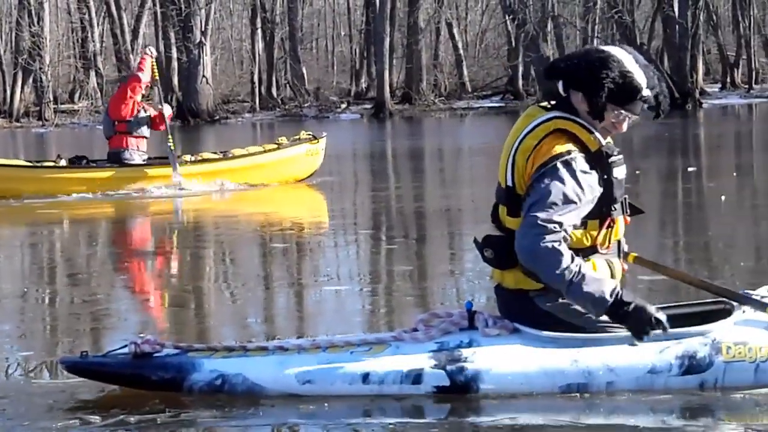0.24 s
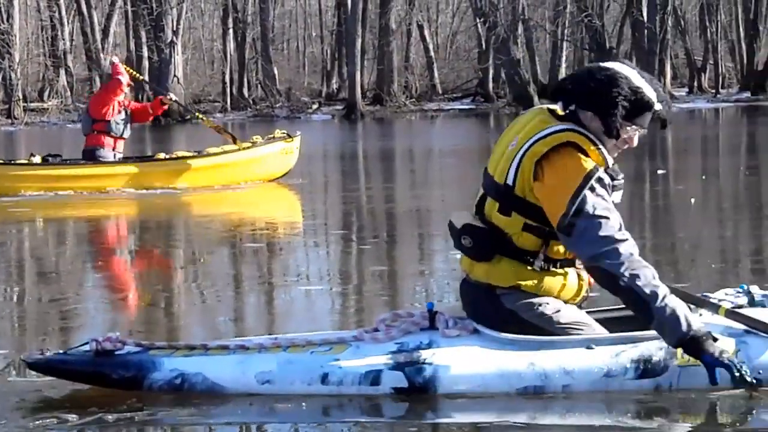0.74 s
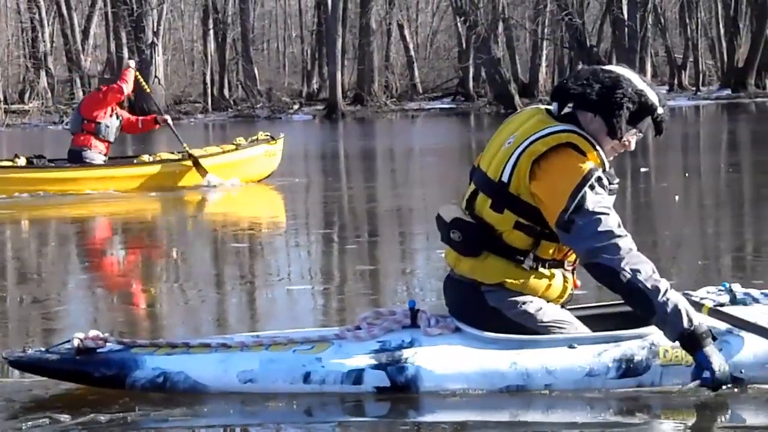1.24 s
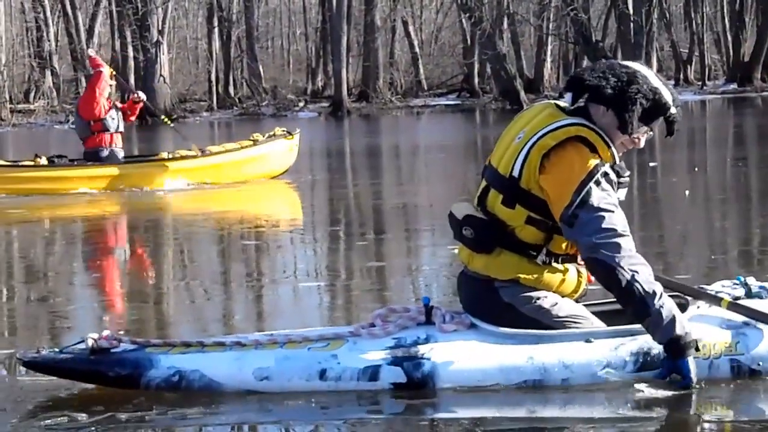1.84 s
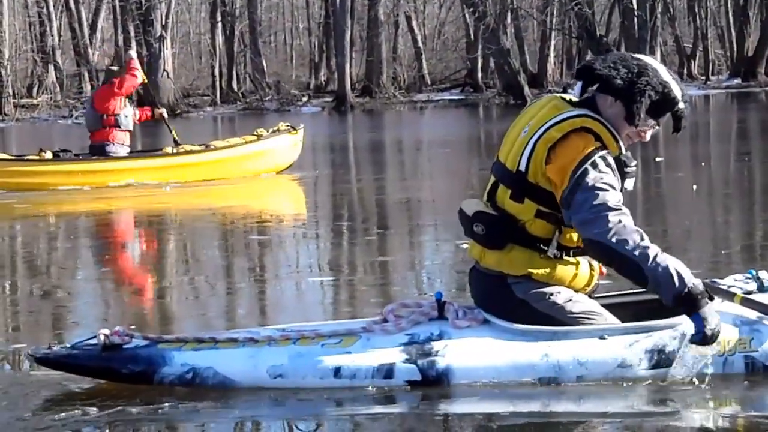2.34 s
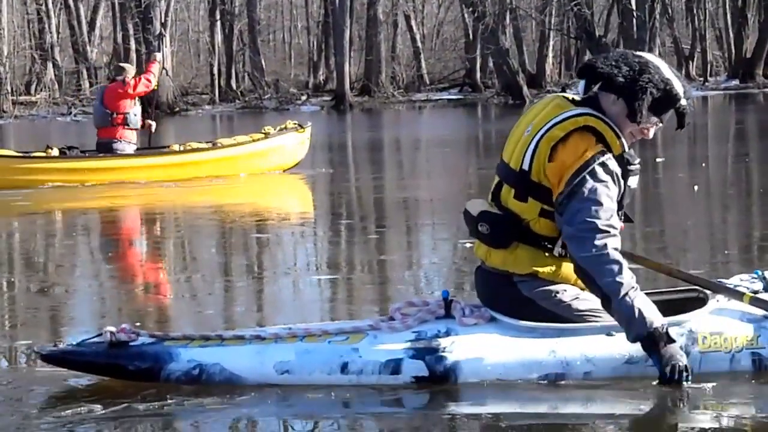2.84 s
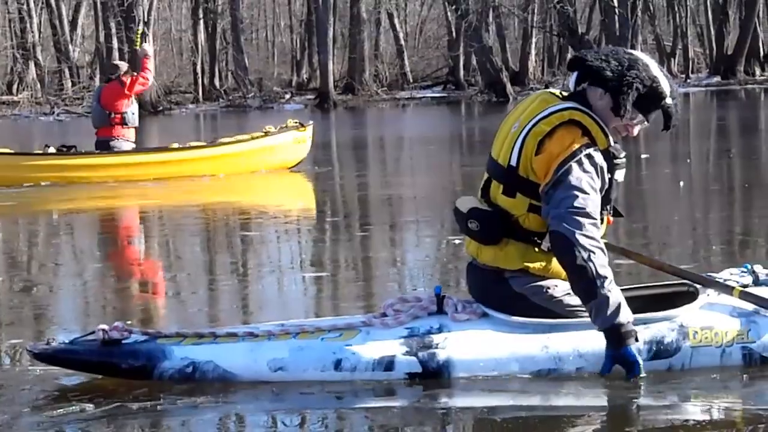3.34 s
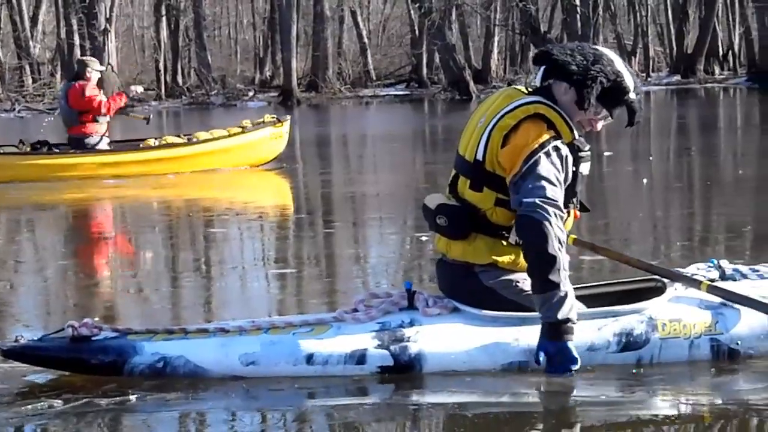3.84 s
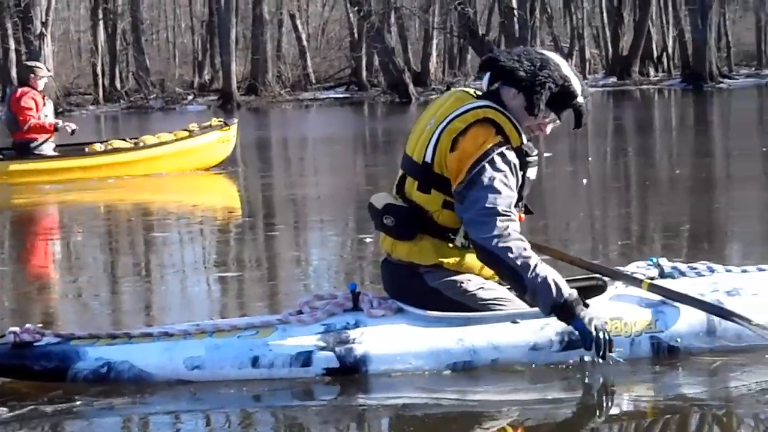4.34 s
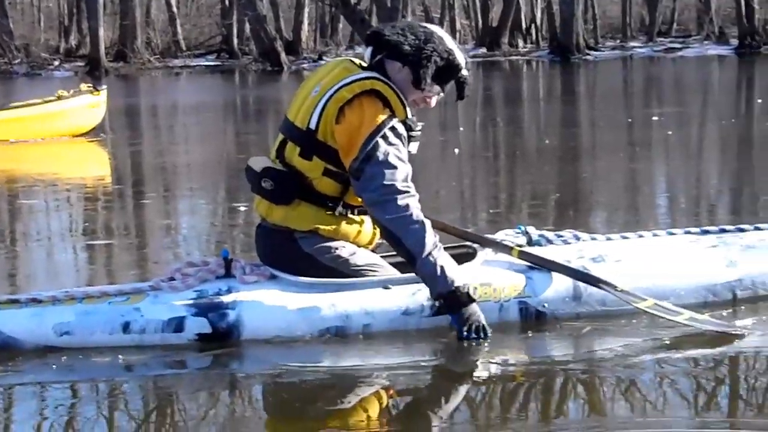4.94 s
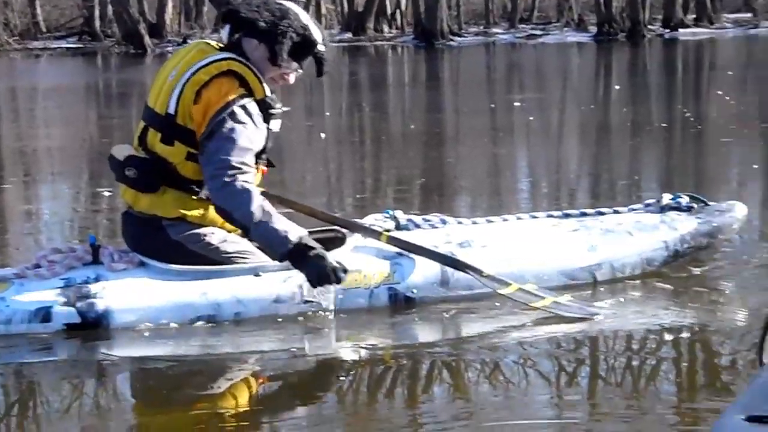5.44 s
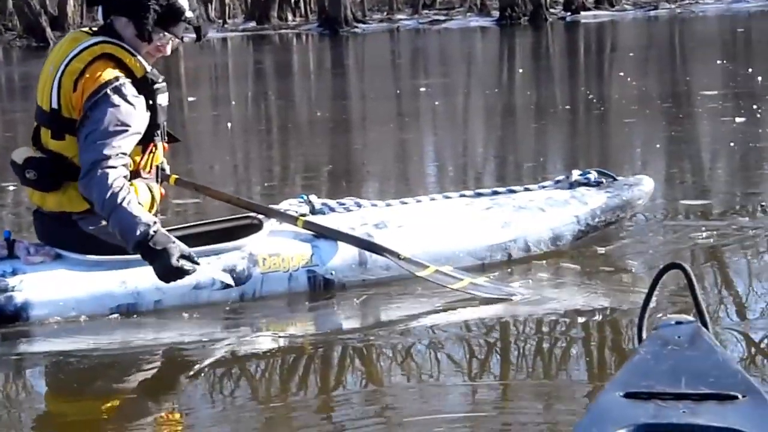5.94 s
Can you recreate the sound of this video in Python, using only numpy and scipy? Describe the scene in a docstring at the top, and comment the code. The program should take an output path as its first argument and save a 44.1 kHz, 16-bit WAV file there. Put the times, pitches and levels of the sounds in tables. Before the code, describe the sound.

Outdoors on a calm river, a gloved paddler breaks thin ice beside a plastic kayak. Distant chirping cracks come first, then around one second a dense close crunch with hull thumps, slosh, bubbles and spray. Separate brittle snaps follow, then softer far-off pinging crackles, fading to faint drips and hiss. The sealed camera microphone makes the ice narrow, bright and glassy; a tiny regular tick appears late.

```python
"""Cracks run through thin river ice as bending waves, treble first, so far ones fall in pitch.
Around them broken plates crackle and grind, water sloshes, gurgles and sprays, and drifting kayaks
rumble and are knocked. Noise bursts make ice and water; decaying tones make clinks, bubbles and hulls.
The microphone sits in a sealed camera whose port favours the ice at 3-4 kHz; the camera adds hiss
and, late on, a small regular tick. The ice breaks close by or far off, in turns."""
import sys
import numpy as np
from scipy import signal
from scipy.fft import rfft, irfft
from scipy.io import wavfile
from scipy.ndimage import uniform_filter1d

SR = 44100
rng = np.random.default_rng(int(sys.argv[2]) if len(sys.argv) > 2 else 0)


def master_out(mix):
    """Clip the mix to full scale and print it as 16-bit PCM to the path in sys.argv[1]."""
    frames = np.transpose(np.atleast_2d(mix))
    ceiling = np.clip(frames, -1, 1)
    pcm = np.round(ceiling * 32767).astype(np.int16)
    wavfile.write(sys.argv[1], SR, pcm)


N = 273420

# Spectrum of the camera's hiss: (frequency [Hz], level [dB])
HISS_SPECTRUM = [(210, -43), (350, -14.5), (744, 4), (928, -1), (1020, 5.5), (1120, -3.5), (1940, -7),
                 (3020, -3.5), (4260, -4.5), (6220, -18), (13400, -17.5), (14300, -14), (15000, -57)]
# Spectrum of light air on the port: (frequency [Hz], level [dB])
AIR_SPECTRUM = [(8.8, -35), (15, -6), (113, -7), (150, -14), (343, -19.5), (450, -19.5), (580, -53),
                (990, -120)]
# Spectrum of the hull rumble: (frequency [Hz], level [dB])
RUMBLE_SPECTRUM = [(35, -33), (60, -14), (128, 1.5), (231, -7), (378, -8.5), (572, -9.5), (600, -15),
                   (780, -65), (1320, -120)]
# Spectrum of sloshing water: (frequency [Hz], level [dB])
SLOSH_SPECTRUM = [(180, -71), (300, -5.5), (576, -10), (640, -1), (930, -5), (1540, -1.5), (2400, -4.5),
                  (3120, -0.5), (5280, -120)]
# Spectrum of spray: (frequency [Hz], level [dB])
SPRAY_SPECTRUM = [(2590, -60), (4400, -1.5), (5260, -11), (7020, -20.5), (9960, -20.5), (10900, -27.5),
                  (12500, -27.5), (16200, -63), (22000, -120)]
# Water stirred up: (time [s], slosh level [dB], spray level [dB])
WATER_LEVELS = [(0.0, -43.5, -52.5), (0.88, -55.5, -60), (0.96, -43, -61), (1.02, -47, -55),
                (1.08, -48, -63), (1.2, -40, -39), (1.31, -30.5, -49.5), (1.44, -38.5, -51),
                (1.52, -44.5, -58.5), (2.08, -50.5, -54.5), (2.32, -65, -63.5), (2.37, -63, -60),
                (2.41, -51, -56), (2.97, -53, -60), (3.9, -63, -63), (4.26, -54, -55.5), (4.97, -63, -66),
                (5.02, -51, -56), (5.12, -55, -59.5), (6.2, -68, -76)]
# Single bubbles: (time [s], peak level [dB], starting pitch [Hz])
BUBBLE_EVENTS = [(0.075, -29, 643), (1.243, -28, 1400), (1.299, -24, 1500), (1.396, -26.5, 656),
                 (1.572, -35.5, 700), (2.07, -36, 1900), (2.1, -40, 1510), (2.119, -36.5, 1200),
                 (2.328, -42, 1480), (2.587, -36.5, 710), (2.95, -37, 760), (4.232, -35, 748),
                 (4.243, -37, 704), (4.29, -46, 720), (5.267, -41, 2160), (6.183, -42, 1420)]
# Knocks on a hull: (time [s], peak level [dB], starting pitch [Hz], 60 dB decay [s], slap over low mode [dB])
HULL_KNOCKS = [(0.019, -43.5, 157, 0.063, 12.5), (0.937, -28, 135, 0.083, 4), (1.064, -32, 121, 0.16, 5),
               (1.455, -47, 170, 0.06, 12), (2.049, -42.5, 254, 0.11, -10),
               (2.499, -49.5, 80.7, 0.06, 12.5), (2.585, -40, 181, 0.18, -12),
               (2.823, -34.5, 113.4, 0.18, 1), (3.725, -43.5, 93, 0.62, -30), (4.869, -50, 110, 0.06, 9.5),
               (4.99, -47, 76.4, 0.073, 10), (5.008, -36.5, 84, 0.053, 0.5)]
# Spectrum of the hollow slap in a knock: (frequency [Hz], level [dB])
SLAP_SPECTRUM = [(88, -35), (150, 1), (685, 0.5), (975, -9), (2200, -58), (2500, -11), (3250, -47),
                 (5500, -120)]
# Puffs of fine spray: (time [s], peak level [dB], fall time [s])
SPRAY_PUFFS = [(0.934, -29, 0.0038), (0.954, -20, 0.0049), (0.983, -37, 0.012), (1.138, -38, 0.02),
               (1.352, -29, 0.01), (1.422, -28.5, 0.016), (1.53, -33, 0.006), (1.921, -39, 0.008),
               (2.363, -25.5, 0.012), (2.494, -32.5, 0.01), (2.539, -30.5, 0.023), (2.751, -38, 0.043),
               (3.365, -44, 0.021), (3.548, -39, 0.025), (4.079, -38, 0.016), (4.405, -36, 0.02),
               (4.563, -38, 0.068), (4.796, -42, 0.006), (5.016, -40, 0.035), (5.083, -39, 0.037),
               (5.158, -42, 0.008), (5.452, -43.5, 0.028), (5.575, -37.5, 0.038), (5.976, -42, 0.042),
               (6.116, -39, 0.023)]
# Broad colour of ice heard through the port: (frequency [Hz], level [dB])
PORT_SPECTRUM = [(1060, -56), (1800, -16), (2320, 1.5), (3520, 5), (4140, 1.5), (4760, -6), (6500, -23),
                 (8450, -63), (14300, -120)]
# Resonances of the port cavity: (frequency [Hz], width [Hz], boost [dB])
PORT_RESONANCES = [(2940, 250, 5), (3596, 28, 9), (4204, 680, 7.5)]
# Crackle of broken plates: (time [s], level [dB])
PLATE_LEVELS = [(0.0, -37.5), (0.3, -37.5), (0.57, -44), (0.93, -45.5), (1.02, -34.5), (1.12, -35.5),
                (1.23, -27.5), (1.31, -32.5), (1.59, -43), (2.04, -46), (2.47, -52.5), (2.68, -50),
                (2.8, -48.5), (3.19, -46.5), (3.4, -52), (3.64, -54), (4.04, -54.5), (4.44, -44),
                (4.7, -54), (5.1, -52.5), (5.7, -54), (6.2, -54)]
# Spells when the ice breaks far off, nearby otherwise: (start [s], end [s])
FAR_TIMES = [(0, 1.1), (2.85, 4.75)]
# Clearest cracks: (time [s], peak level before spreading [dB], centre [Hz], share of water thrown up [dB])
CLEAR_CRACKS = [(0.018, -25, 3300, -24), (0.047, -35, 3070, -13), (0.181, -15, 3320, -27),
                (0.21, -25, 3080, -62), (0.235, -17.5, 3160, -34), (0.278, -23.5, 3330, -28),
                (0.639, -29, 2850, -11), (0.949, -15, 3080, -38), (0.96, -11, 3500, -10.5),
                (0.968, -10.5, 3140, -15), (0.982, -12, 3250, -17), (1.059, -17, 3170, -22),
                (1.112, -19.5, 2900, -28), (1.129, -18.5, 2920, -6), (1.139, -17, 2710, -8),
                (1.157, -8.5, 3430, -16), (1.184, -14, 3230, -13), (1.197, -15, 3680, -19),
                (1.239, -23, 3700, -6), (1.256, -21, 3600, -7), (1.324, -24, 3220, -12),
                (1.346, -19.5, 3860, -1.5), (1.394, -19.5, 3780, -3), (1.424, -17, 3600, -6),
                (1.433, -11.5, 3730, -12), (1.492, -22, 3500, -5.5), (1.562, -26, 3550, -5),
                (1.573, -18, 3500, -6.5), (1.661, -17.5, 3470, -24), (1.748, -37, 4270, -12),
                (1.777, -28, 4430, -3), (1.803, -30.5, 3820, -1.5), (1.818, -33, 4190, 0.5),
                (1.94, -29.5, 4200, -6), (1.972, -25.5, 4300, -7), (2.11, -35, 4230, -9),
                (1.921, -27, 4080, 2.5), (1.962, -24, 4340, -21), (1.983, -29.5, 3720, -12),
                (2.038, -21.5, 4170, -9), (2.064, -28.5, 3260, -6), (2.141, -30.5, 3970, 1.5),
                (2.344, -31, 4370, -21), (2.365, -9, 3920, -17), (2.375, -23.5, 3430, -7),
                (2.391, -27, 4400, -9), (2.43, -23.5, 4340, -21), (2.445, -29, 4300, -14),
                (2.477, -27.5, 4200, -19), (2.496, -26.5, 4020, -9), (2.544, -26.5, 3870, -11),
                (2.556, -24.5, 3760, -11), (2.753, -36, 3800, -18), (2.825, -33.5, 4400, 1.5),
                (2.937, -31.5, 3100, -25), (2.966, -28, 3350, -33), (2.984, -21, 3170, -33),
                (3.001, -23.5, 3200, -36), (3.014, -21.5, 3100, -31), (3.026, -24, 3280, -22),
                (3.085, -28, 3300, -26), (3.197, -19.5, 3360, -27), (3.206, -19, 3220, -25),
                (3.303, -18, 3250, -40), (3.316, -18.5, 3220, -32), (3.332, -22.5, 3230, -19),
                (3.347, -25, 3200, -21), (3.748, -27, 3140, -34), (3.78, -35.5, 3350, -21),
                (4.191, -21, 3530, -33), (4.198, -19, 3220, -18), (4.27, -22.5, 3280, -21),
                (4.293, -21, 3480, -27), (4.314, -21, 3250, -31), (4.324, -14, 3280, -34),
                (4.359, -29, 3200, -22), (4.424, -22.5, 3320, -26), (4.464, -22.5, 3050, -32),
                (4.5, -20, 3000, -39), (4.61, -23, 3260, -13), (4.624, -25.5, 3070, -20),
                (4.797, -34, 3880, -21), (5.019, -32.5, 3430, 2), (5.044, -34, 3550, -14),
                (5.083, -35, 3700, -10), (5.144, -31, 3340, -25), (5.158, -29.5, 4450, -9),
                (5.295, -35.5, 2900, -2), (5.418, -33, 3650, -10), (5.46, -38, 4370, -20),
                (5.59, -37.5, 3820, -3), (6.165, -37, 3770, -21), (6.182, -39, 3920, -1.5)]

# camera and air
HISS_LEVEL_DB, AIR_LEVEL_DB = -54.5, -52
TICK_FIRST_S, TICK_EVERY_S = 4.684, 2 / 15
TICK_DB, TICK_HZ, TICK_WIDTH_HZ = -37, 1700, 700
TOP_HZ = 14250
# hull rumble when the slosh is at the calm level, and its dB per dB of slosh
RUMBLE_DB, RUMBLE_FOLLOWS, CALM_DB = -54, 0.3, -50
SHUDDER_DB, SHUDDER_S = -12.5, 0.044  # swell of the rumble after a knock: level over the knock, fall
PUFF_RISE_S, CHIPS_DB = 0.0032, 1.5  # ice chips in a puff, over its drops
# ice, each pair being (near, far)
PITCH_HZ = 3660, 3260  # of broken plates and small cracks
TRAVEL_MS = 9.62, 58  # through the sheet, at 4 kHz
WIDTH_HZ = 1030, 534  # band of a crack of -22 dB
FLOOR = 0.28, 0.12  # share of a crack outside its band
TEAR_S = (0.0003, 0.0034), (0.0015, 0.0046)  # (rise, fall) of the tearing
CRACK_SPRAY_DB, SPRAY_FOLLOWS = (-16, -12.5), 0.63  # spray share; its dB per dB of water share
SMALL_WATER_DB, SMALL_WATER_SCATTER_DB = (-11, -20), 3  # water share in small cracks; its spread
# small cracks: peak over the crackle, spread of level and of pitch
SMALL_DB, SMALL_SCATTER_DB, SMALL_OCTAVES = 8, 2.5, 0.18


def undb(db):
    """Amplitude of a level in dB."""
    return 10 ** (np.asarray(db) / 20)


def unit(x):
    """Scale to rms 1."""
    return x / np.sqrt(np.mean(x ** 2))


def gain(spectrum, size):
    """Gain of a spectrum on the bins of a transform, straight over log frequency; -90 dB outside it."""
    hz, db = np.transpose(spectrum)
    bins = np.maximum(np.fft.rfftfreq(size, 1 / SR), 1)
    return undb(np.interp(np.log(bins), np.log(hz), db, left=-90, right=-90))


def colour(x, spectrum):
    """Give x a spectrum, rms 1."""
    return unit(irfft(rfft(x) * gain(spectrum, len(x)), len(x)))


def add(out, s, sound, db):
    """Mix a short sound in at time s with the given peak level."""
    start = int(s * SR)
    sound = sound * undb(db) / np.abs(sound).max()
    sound = sound[max(-start, 0):max(N - start, 0)]
    out[max(start, 0):max(start, 0) + len(sound)] += sound


def grit(scatter_db, size=N):
    """Noise whose samples now and then stand far out: many small fractures or drops."""
    noise = rng.standard_normal(size)
    outburst = rng.exponential(size=size)
    return noise * undb(scatter_db * outburst)


def walk(rate_hz):
    """Random levels joined by straight slews of 1 / rate_hz, rms near 1."""
    hold = int(SR / rate_hz)
    steps = np.repeat(rng.standard_normal(N // hold + 1), hold)
    return unit(uniform_filter1d(steps, hold)[:N])


def ring_down(hz, t60, glide):
    """A decaying tone with a short onset whose pitch drifts by the share glide over t60."""
    t = np.arange(int(max(t60, .005) * SR)) / SR
    tone = np.sin(2 * np.pi * hz * (t + glide * t ** 2 / t60 / 2))
    return tone * 1000 ** (-t / t60) * np.minimum(t / 0.00131, 1)


def far(s):
    """1 while the ice breaks far off, else 0."""
    return sum((s >= start) & (s < end) for start, end in FAR_TIMES) * 1


def camera():
    """Slightly wavering hiss at the microphone, and a faint regular tick from inside the housing."""
    out = undb(HISS_LEVEL_DB + 1.1 * walk(14)) * colour(rng.standard_normal(N), HISS_SPECTRUM)
    t = np.arange(256) / SR
    tick = np.sin(2 * np.pi * TICK_HZ * t) * t * np.exp(-2 * np.pi * TICK_WIDTH_HZ * t)
    for s in np.arange(TICK_FIRST_S, N / SR, TICK_EVERY_S):
        add(out, s, tick, TICK_DB + 1.0 * rng.standard_normal())
    return out


def light_air():
    """Light air on the port: steady, mostly low noise."""
    return undb(AIR_LEVEL_DB) * colour(rng.standard_normal(N), AIR_SPECTRUM)


def rumble(slosh_db):
    """The hull rumbles with the water and shudders after knocks."""
    t = np.arange(N) / SR
    swell = undb(RUMBLE_DB + RUMBLE_FOLLOWS * (slosh_db - CALM_DB) + 0.54 * walk(11))
    for s, db, *_ in HULL_KNOCKS:
        swell = swell + undb(db + SHUDDER_DB) * (t > s) * np.exp(-np.abs(t - s) / SHUDDER_S)
    return swell * colour(rng.standard_normal(N), RUMBLE_SPECTRUM)


def gurgle(count=900):
    """Many small bubbles of random pitch and loudness, each rising as it rings."""
    out = np.zeros(N)
    for when, height, loud in rng.random((count, 3)):
        hz = 580 * 2 ** (2.0 * height)
        add(out, when * N / SR, ring_down(hz, 22 / hz, 0.2), 5 * np.log(loud + 0.026))
    return unit(out)


def slosh(slosh_db, fits):
    """Moving water: gritty noise that comes in short fits, with gurgling under it."""
    wash = colour(grit(2.63), SLOSH_SPECTRUM) * undb(0.33 * fits)
    return undb(slosh_db) * unit(wash + 0.66 * gurgle())


def spray(spray_db, fits):
    """Many falling drops: bright gritty noise, in the same fits as the slosh."""
    return undb(spray_db + 2.5 * fits) * colour(grit(1.8), SPRAY_SPECTRUM)


def bubbles():
    """Trapped air rings for some cycles and rises in pitch as it nears the surface."""
    out = np.zeros(N)
    for s, db, hz in BUBBLE_EVENTS:
        add(out, s, ring_down(hz, 28 / hz, 0.16), db)
    return out


def knocks():
    """Plastic hull: a dull low mode, a looser one above it and a short hollow slap."""
    out, t = np.zeros(N), np.arange(2048) / SR
    for s, db, hz, t60, slap_db in HULL_KNOCKS:
        add(out, s, ring_down(hz, t60, -0.057), db)
        add(out, s + 0.0021, ring_down(1.92 * hz, 0.89 * t60, -0.052), db - 12.5)
        slap = colour(rng.standard_normal(2048), SLAP_SPECTRUM) * np.exp(-t / 0.013)
        add(out, s, slap, db + slap_db)
    return out


def puffs():
    """Tiny drops and ice chips fly up at once and patter out."""
    out, t = np.zeros(N), np.arange(8192) / SR
    for s, db, fall_s in SPRAY_PUFFS:
        swell = np.minimum(t / PUFF_RISE_S, 1) * np.exp(-t / fall_s)
        drops = colour(grit(1.2, len(t)), SPRAY_SPECTRUM)
        chips = colour(grit(1.2, len(t)), PORT_SPECTRUM)
        add(out, s, (drops + undb(CHIPS_DB) * chips) * swell, db)
    return out


def port_gain(size):
    """The broad colour of the port with its resonances on top."""
    hz = np.fft.rfftfreq(size, 1 / SR)
    boost_db = sum(db / (1 + (2 * (hz - f) / width) ** 2) for f, width, db in PORT_RESONANCES)
    return gain(PORT_SPECTRUM, size) * undb(boost_db)


def plates(count=2600):
    """Fragments clink near the centre pitch, falling a little, over their own fine grinding."""
    clinks = np.zeros(N)
    times = rng.random(count) * N / SR
    for when, off, loud in zip(times, rng.standard_normal(count), rng.exponential(size=count)):
        hz = PITCH_HZ[far(when)] * 2 ** (0.21 * off)
        add(clinks, when, ring_down(hz, 45 / hz, -0.1), 1.8 * loud)
    both = unit(clinks) + 3.1 * unit(grit(3.1))
    through_port = unit(irfft(rfft(both) * port_gain(N), N))
    level_db = np.interp(np.arange(N) / SR, *np.transpose(PLATE_LEVELS))
    return undb(level_db + 0.5 * walk(40) + 3.1 * walk(9)) * through_port


def small_cracks(count=70):
    """Lesser cracks at random moments, their peaks following the level of the crackle."""
    s = rng.random(count) * N / SR
    level_draw, pitch_draw, water_draw = rng.standard_normal((count, 3)).T
    db = np.interp(s, *np.transpose(PLATE_LEVELS)) + SMALL_DB + SMALL_SCATTER_DB * level_draw
    hz = np.take(PITCH_HZ, far(s)) * 2 ** (SMALL_OCTAVES * pitch_draw)
    water_db = np.take(SMALL_WATER_DB, far(s)) + SMALL_WATER_SCATTER_DB * water_draw
    return list(zip(s, db, hz, water_db))


def bend(hz, travel_ms, top_hz=4000, middle_hz=3400, foot_hz=2900):
    """Bending waves arrive later as 1 / sqrt(frequency) down to the foot, where they all leave together."""
    delay = np.sqrt(top_hz / np.clip(hz, foot_hz, top_hz))
    late_s = travel_ms / 1000 * (delay - np.sqrt(top_hz / middle_hz))  # the middle pitch is on time
    return np.exp(-2j * np.pi * np.cumsum(late_s) * hz[1])


def cracks(size=4096):
    """Each crack is a short tearing burst that rings around its own pitch and is spread out on its way."""
    out, hz = np.zeros(N), np.fft.rfftfreq(size, 1 / SR)
    t = np.arange(size) / SR - size / SR / 4
    low, high = (g / np.sqrt(np.sum(g ** 2)) for g in (gain(SLOSH_SPECTRUM, size), gain(SPRAY_SPECTRUM, size)))
    # a quick build-up and snap, then fragments settling
    settle = .2 * (t > 0) * np.exp(-np.abs(t) / .014)
    shapes = [np.exp(-np.abs(t) / np.where(t < 0, rise_s, fall_s)) + settle for rise_s, fall_s in TEAR_S]
    for s, db, centre_hz, water_db in CLEAR_CRACKS + small_cracks():
        place = far(s)
        spray_db = CRACK_SPRAY_DB[place] + SPRAY_FOLLOWS * water_db
        # harder cracks reach over a wider band; the freed shard adds a narrow ring
        width_hz = WIDTH_HZ[place] * undb(0.23 * (db + 22))
        band = np.exp(-((hz - centre_hz) / width_hz) ** 2)
        shard = 0.44 / (1 + 1j * (hz - centre_hz) / 70)
        ring = port_gain(size) * (FLOOR[place] + shard + band)
        ring = ring / np.sqrt(np.sum(np.abs(ring) ** 2))
        tear = rfft(grit(0.97, size) * shapes[place])
        spread = ring * bend(hz, TRAVEL_MS[place])
        sound = irfft(tear * (spread + undb(water_db) * low + undb(spray_db) * high), size)
        # spreading and water change the peak of the bare crack
        bare_peak = np.abs(irfft(tear * ring, size)).max()
        change_db = 20 * np.log10(np.abs(sound).max() / bare_peak)
        add(out, s + t[0], sound, db + change_db)
    return out


def scene():
    """Camera, air, hulls and water, with the ice in front."""
    s, *columns = np.transpose(WATER_LEVELS)
    slosh_db, spray_db = (np.interp(np.arange(N) / SR, s, c) for c in columns)
    fits = walk(30)  # water moves in short fits
    background = camera() + light_air() + rumble(slosh_db)
    water = slosh(slosh_db, fits) + spray(spray_db, fits) + bubbles() + puffs()
    ice = plates() + cracks()
    return (background + water + knocks() + ice)[None]


def record(dry):
    """The top is cut steeply by an elliptic low-pass."""
    return signal.sosfilt(signal.ellip(10, .2, 60, TOP_HZ, fs=SR, output="sos"), dry)


dry = scene()
out = record(dry)
master_out(out)
```